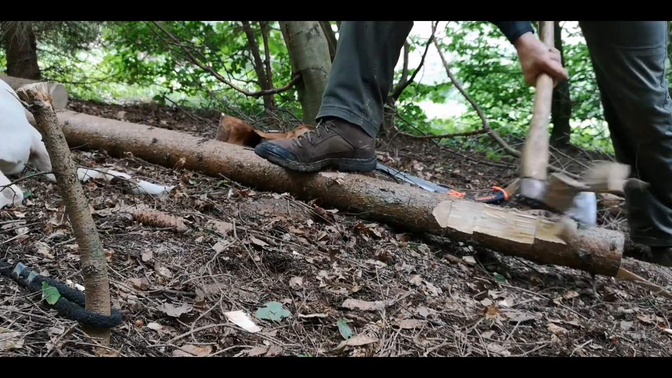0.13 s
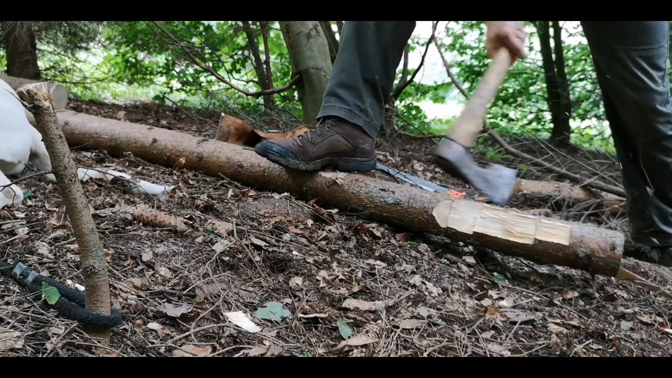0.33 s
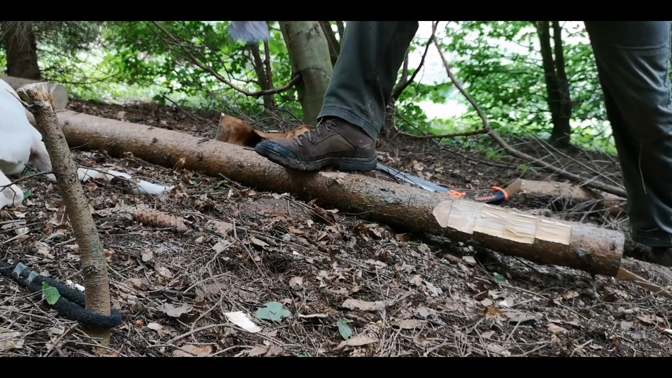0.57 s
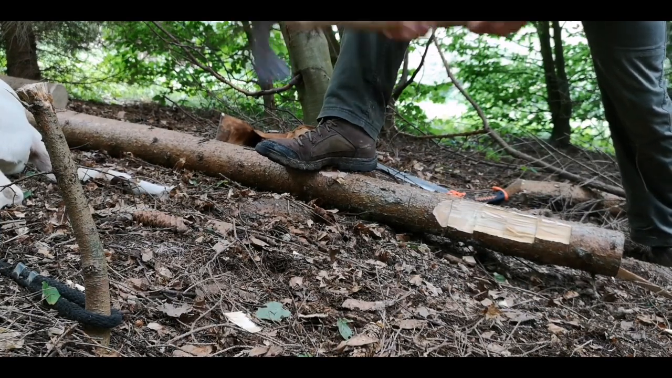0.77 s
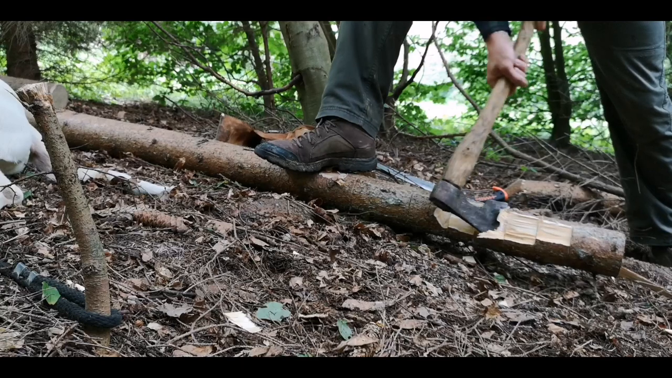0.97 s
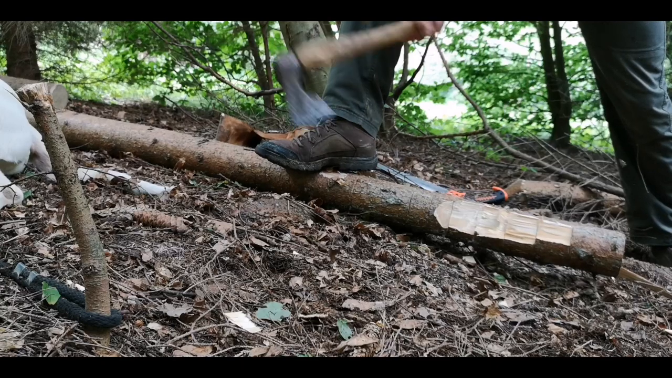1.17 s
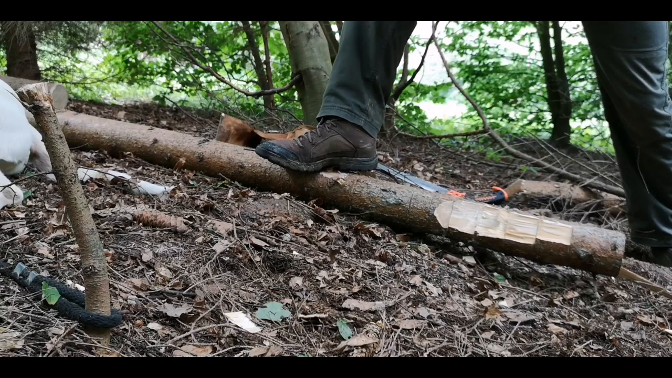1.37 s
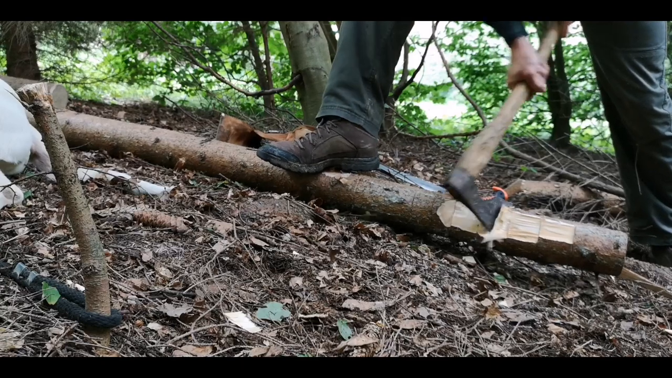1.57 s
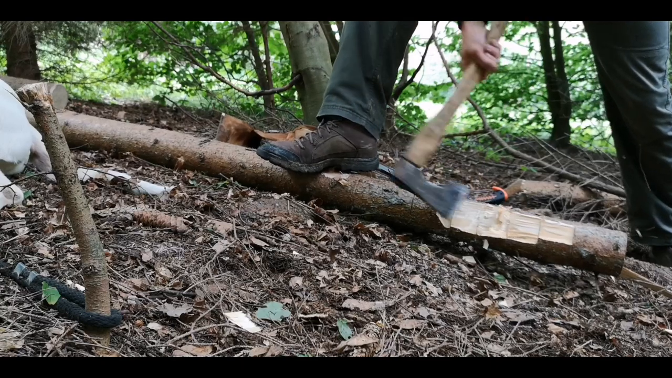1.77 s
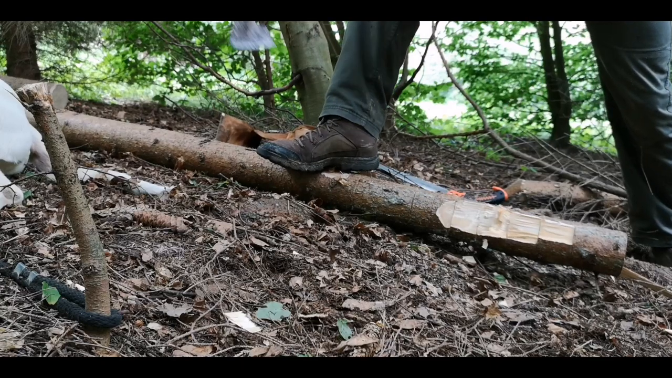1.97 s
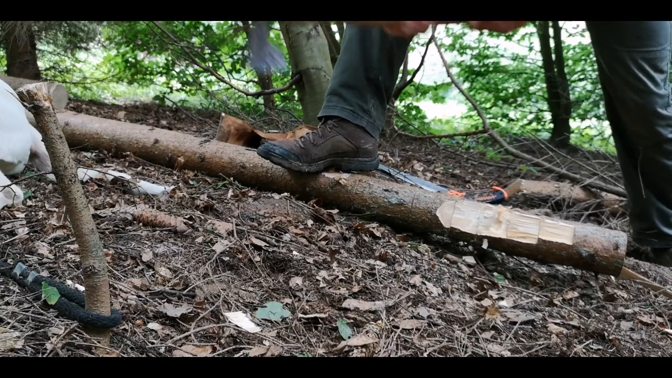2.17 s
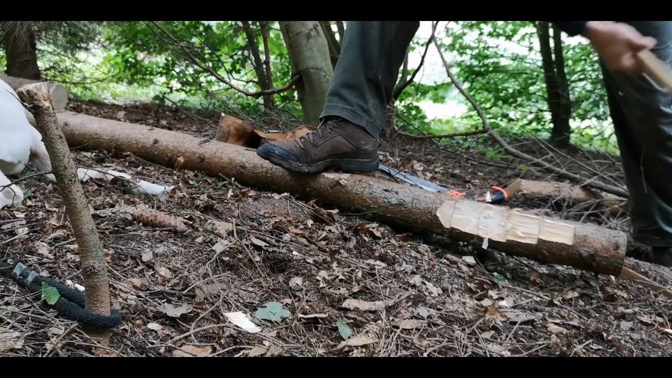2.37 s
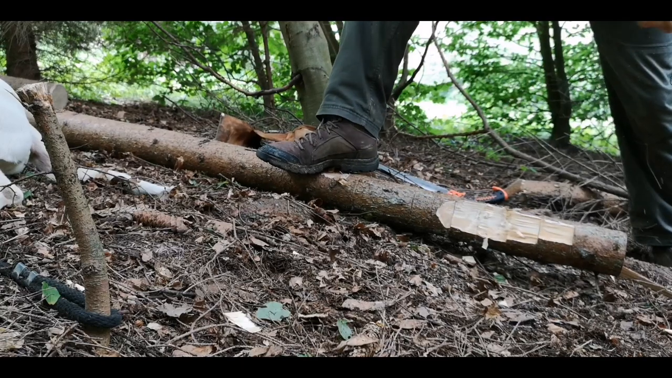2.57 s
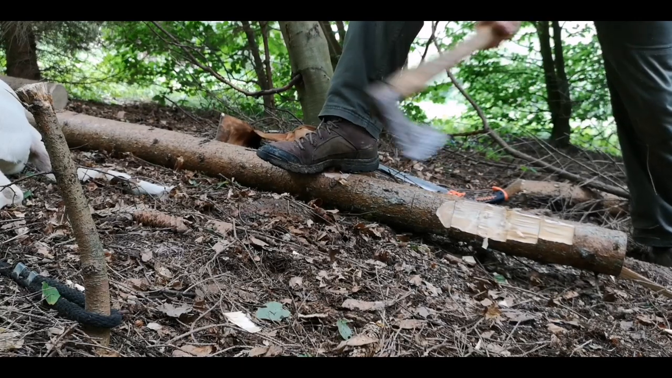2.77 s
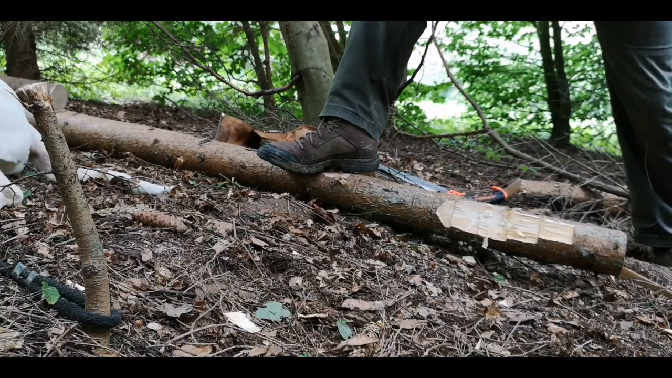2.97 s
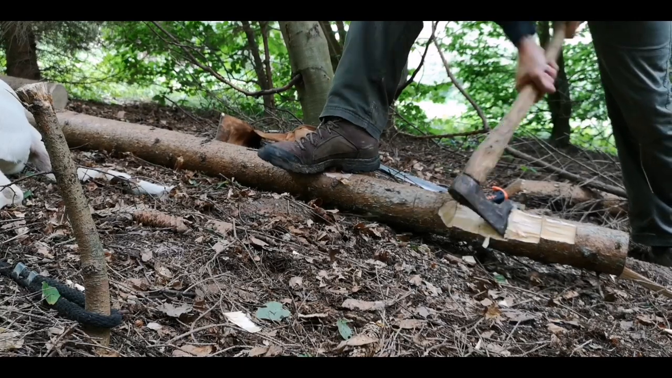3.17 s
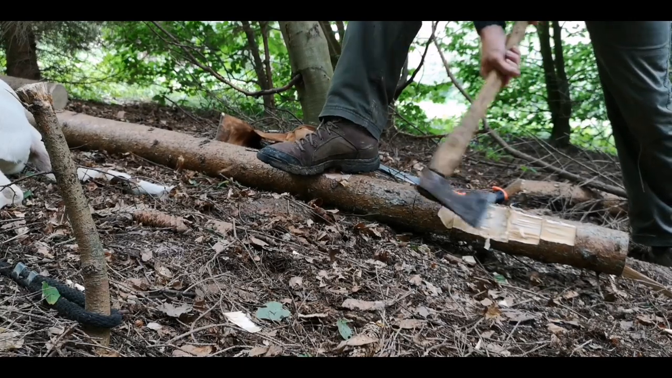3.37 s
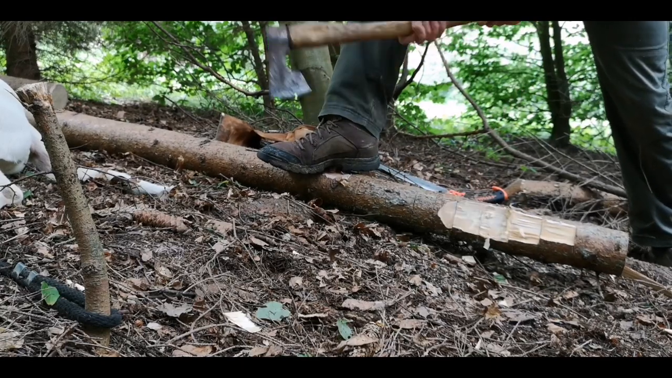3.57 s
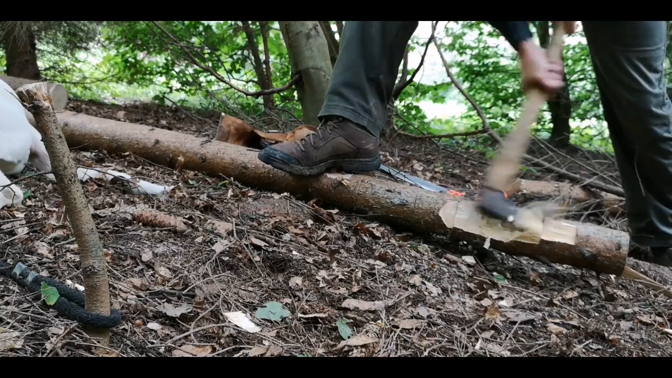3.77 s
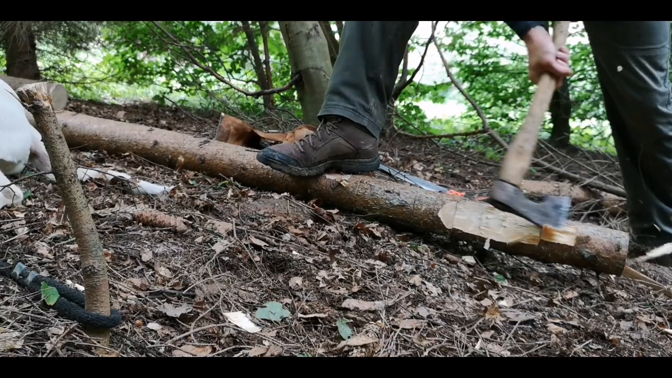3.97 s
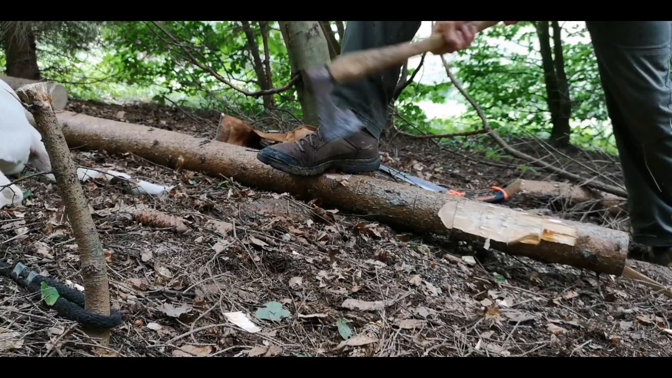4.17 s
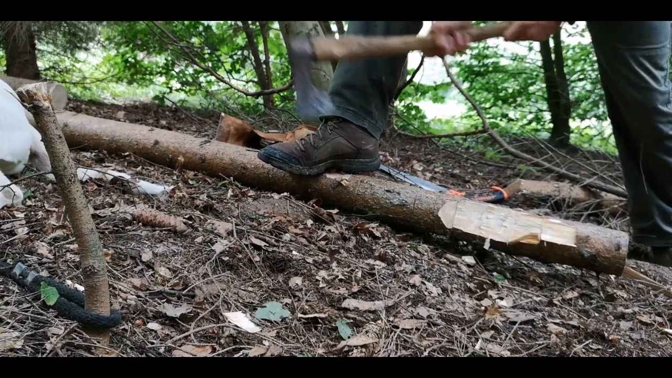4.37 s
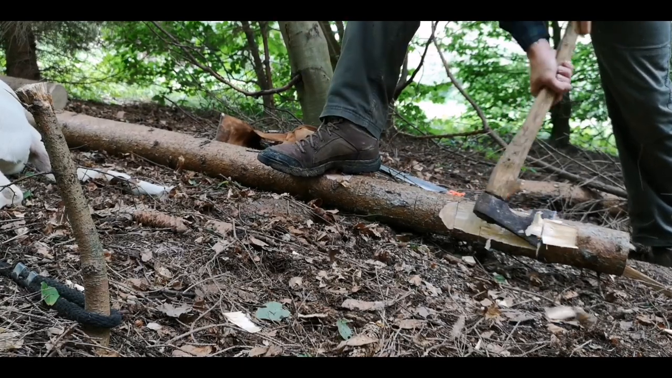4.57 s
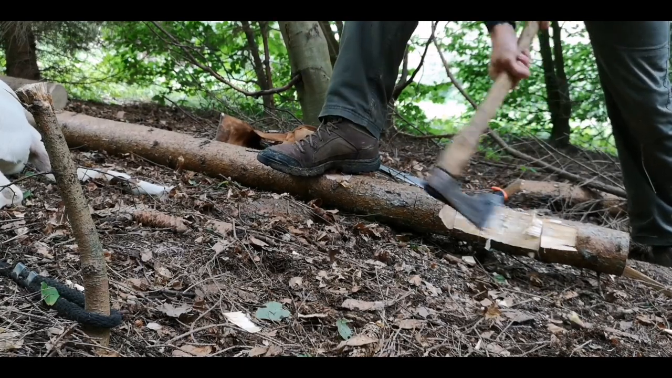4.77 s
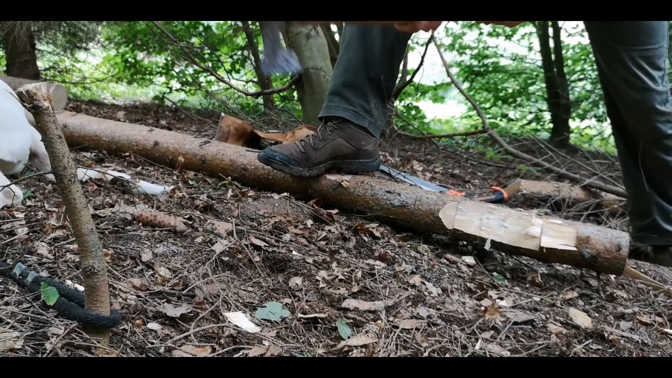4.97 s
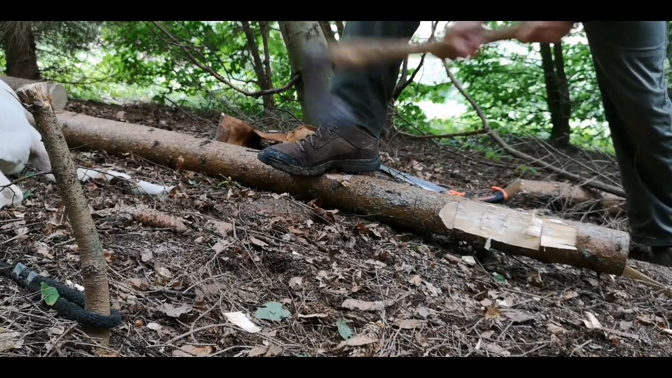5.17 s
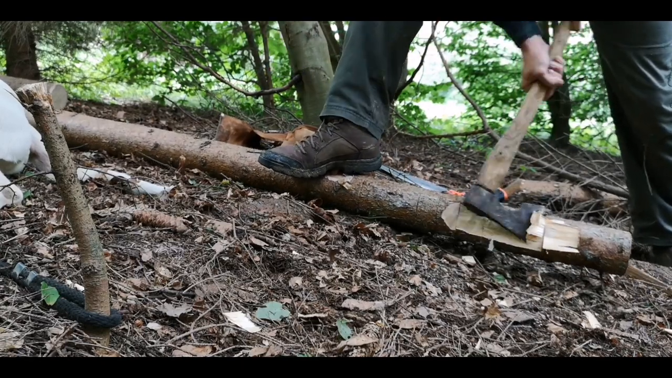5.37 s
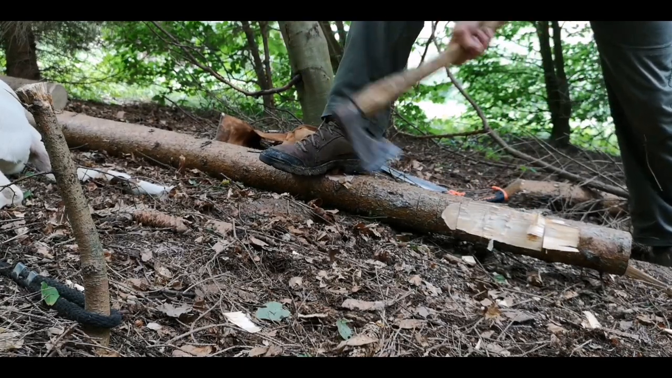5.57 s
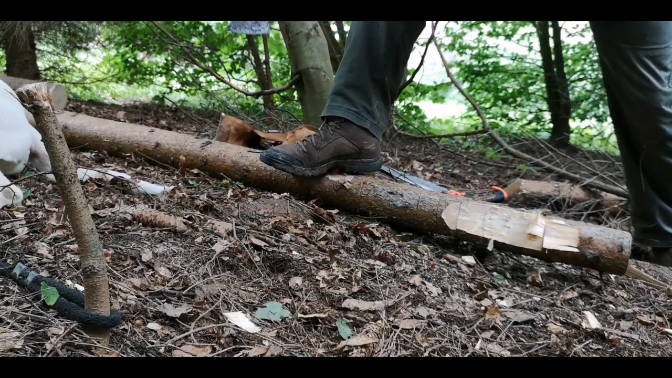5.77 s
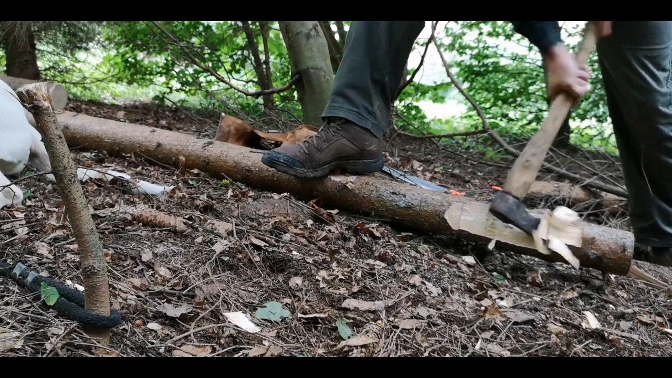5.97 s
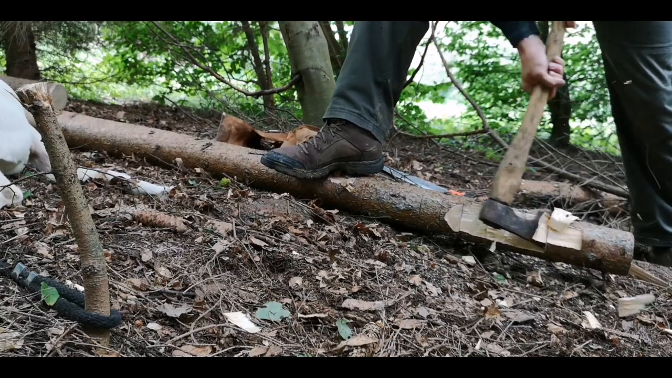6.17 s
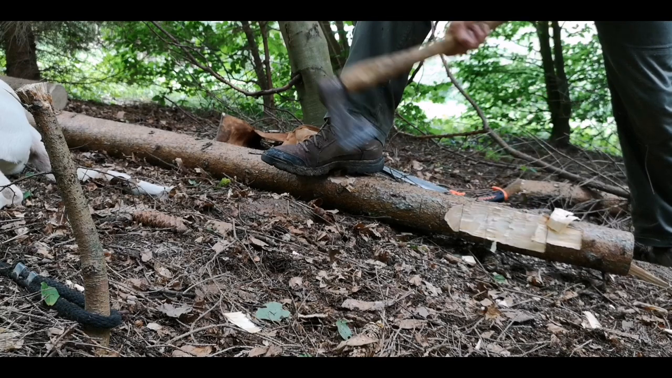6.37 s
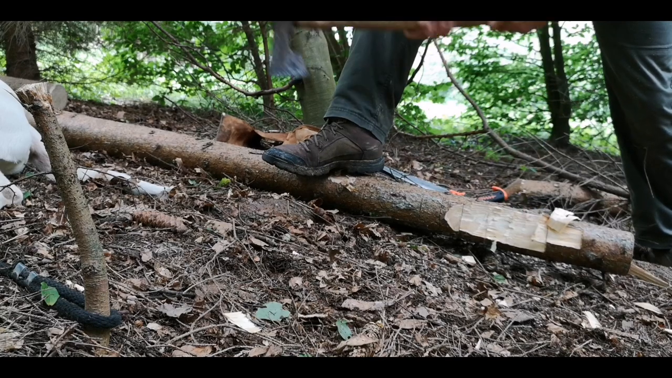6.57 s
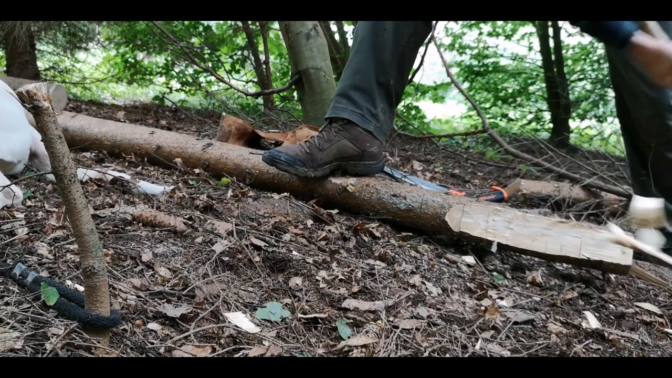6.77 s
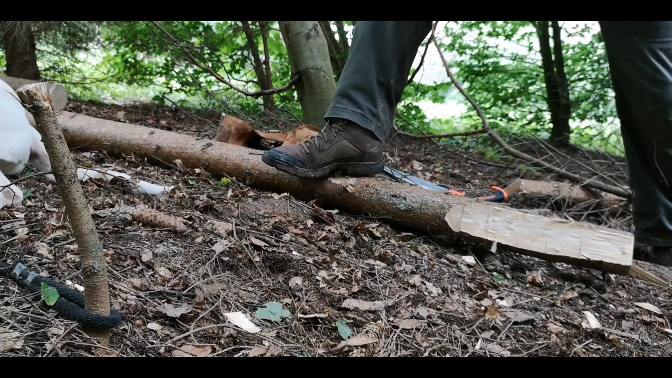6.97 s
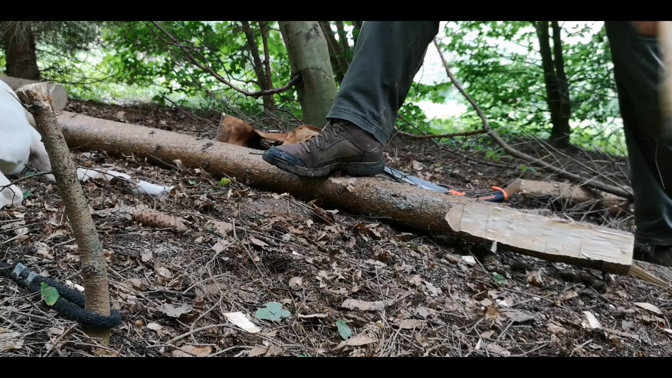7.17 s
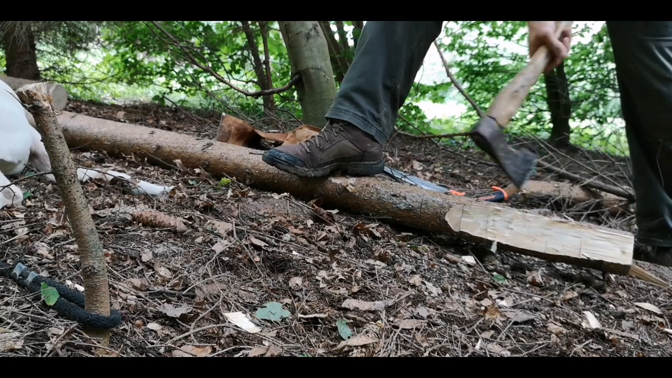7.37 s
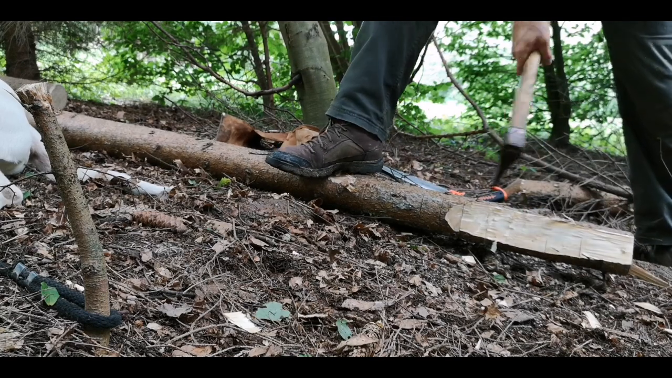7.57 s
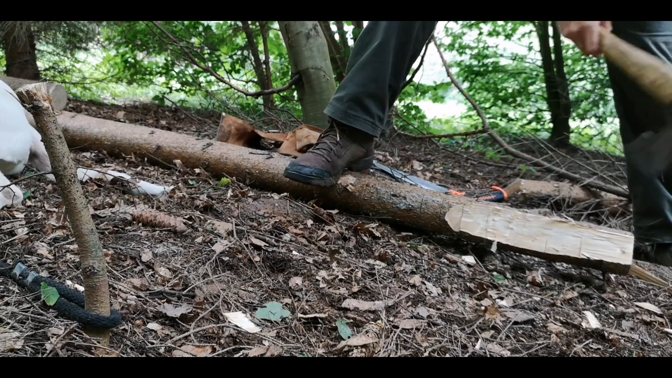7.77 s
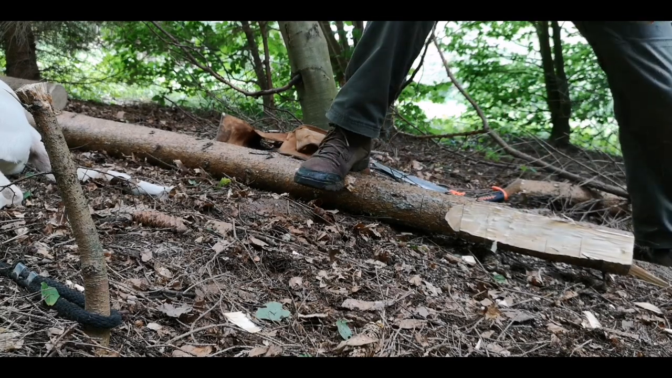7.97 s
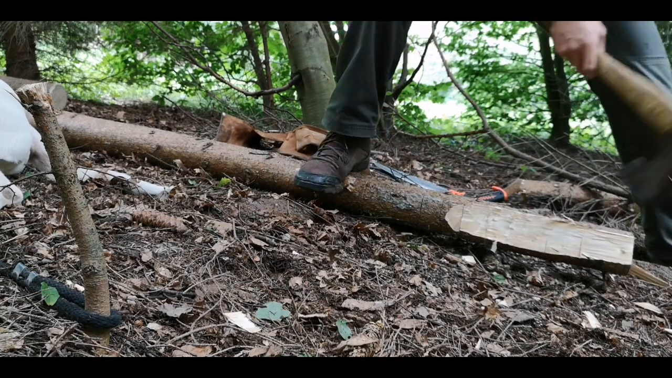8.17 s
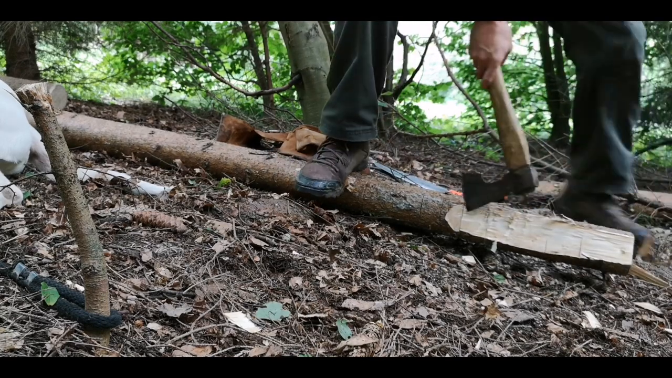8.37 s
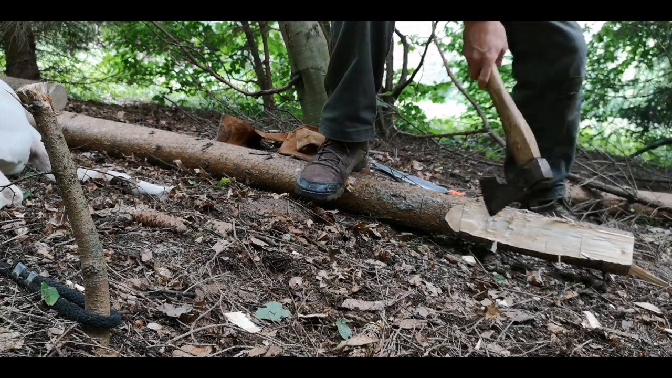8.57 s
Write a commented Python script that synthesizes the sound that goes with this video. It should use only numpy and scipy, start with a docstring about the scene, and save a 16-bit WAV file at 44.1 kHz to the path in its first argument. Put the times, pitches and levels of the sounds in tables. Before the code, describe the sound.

An axe hews a log close by in steady, splintering blows that echo briefly among trees, while chips patter onto leaf litter.

```python
"""Sharp, woody axe blows bite into a felled log, close by in a quiet wood. Each blow rings the log
and the steel head while the fibres split in a cluster of cracks; trunks and a far slope answer.
Chips and bark drop into dry leaf litter, the log bounces and a boot lands near the end.
Far leaves hiss softly underneath."""
import sys
import numpy as np
from scipy import signal
from scipy.fft import rfft, irfft, next_fast_len
from scipy.io import wavfile
from scipy.ndimage import uniform_filter1d, map_coordinates

SR = 44100
rng = np.random.default_rng(int(sys.argv[2]) if len(sys.argv) > 2 else 0)


def transcribe(signal):
    """Save signal, clipped to [-1, 1], as a 16-bit WAV file at the path in sys.argv[1]."""
    frames = np.atleast_2d(signal).T
    limited = np.clip(frames, -1, 1)
    pcm = np.round(limited * 32767).astype(np.int16)
    wavfile.write(sys.argv[1], SR, pcm)


N = 380583

# Blows on the log, two rebounds included. Each row: start in seconds, sway in dB, sway length in seconds,
# thump in dB, seconds the edge keeps driving, five levels in dB for the bend families from low to high,
# axe head in dB, tearing in dB, trunk echo in dB, tail brightness in dB per octave.
BLOWS = [(0.176, -31.5, .15, -18.5, 0.012, -14.5, -23, -17.5, -26, -38, -36.5, -18.5, -30, 0.1),
         (0.996, -31.5, .18, -28, 0.002, -28.5, -26.5, -27.5, -34, -45, -65, -27, -36, -0.5),
         (1.694, -27.5, 0.2, -28, 0.002, -33.5, -27, -39, -34, -50, -69, -26, -35, 0.6),
         (1.83, -58, 0.15, -53, 0.002, -37, -45.5, -53.5, -64, -75, -90, -58, -71, 0.1),
         (2.371, -29.5, .17, -16, 0.017, -17.5, -15.5, -7.5, -31.5, -41, -52, -22, -32, 0.6),
         (3.275, -25.5, 0.22, -24.5, 0.002, -26, -24, -22, -29, -45, -64.5, -25.5, -35.5, 0.1),
         (3.868, -30, .15, -16.5, 0.012, -11.5, -20, -17.5, -35, -41, -55.5, -18, -31.5, 0.1),
         (4.154, -85, .1, -68, 0.002, -68, -70, -59, -65.5, -76, -86.5, -64, -73, 0.1),
         (4.581, -35, 0.17, -23.5, 0.006, -45, -32, -22, -24, -30.5, -56.5, -19, -35, 0.1),
         (5.355, -25.5, 0.21, -30, 0.002, -32.5, -34, -27.5, -32, -50.5, -60, -28, -36, 0.1),
         (6.079, -40, .22, -25, 0.005, -20.5, -32, -25, -30, -30, -58, -18.5, -32, 0.1),
         (6.807, -30, .22, -25, 0.008, -20.5, -36, -32, -21.5, -32, -34.5, -16, -27.5, -0.3),
         (8.438, -35, 0.13, -44, 0.002, -37.5, -44.5, -37.5, -44.5, -65, -96, -42, -50.5, 0.1)]
# The midrange clack of cracks and chips. Each row: centre in Hz, width in Hz, level in dB.
CLACK = [(2060, 610, 0), (2775, 570, -2)]


def log_and_axe_ring():
    """Log and steel ring: where the edge lands sets each bend's level; loose contact adds flutter."""
    # The log's bending modes, one list a family. Each row: pitch in Hz, relative dB, t60 in seconds.
    log_families = [
        [(187.4, -1.5, 0.11)],
        [(343.4, 0.5, 0.23)],
        [(514.4, 0.5, 0.13)],
        [(705.5, 2, 0.13), (852, -9, 0.2), (705, -29, 0.64)],
        [(951, -1.5, 0.25), (1099, 0.5, 0.15), (1120, -35, 1), (1290, -8, 0.069), (1595, -7, 0.12)],
    ]
    # The axe head's modes. Each row: pitch in Hz, relative dB, t60 in seconds.
    steel_modes = [(4640, -1, .3), (5705, 0, .3), (6523, -13, .25), (8900, -12, .2), (11300, -12, .35)]
    out, t = np.zeros(N), np.arange(SR) / SR

    def mode(hz, db, t60, attack, flutter_db):
        flutter = flutter_db * map_coordinates(rng.standard_normal(44), [40 * t])  # 40 values a second
        onset = 1 - np.exp(-(t / attack) ** 2)
        return amp(db + flutter - 60 * t / t60) * np.sin(2 * np.pi * hz * t) * onset

    for start, _, _, _, drive, *bends_db, steel_db, _, _, _ in BLOWS:
        for family, family_db in zip(log_families, bends_db):
            for hz, db, t60 in family:
                detuned = hz * rng.normal(1, 0.0075)
                add(out, start, mode(detuned, db + family_db, t60, drive, flutter_db=2.5 + hz / 400))
        for hz, db, t60 in steel_modes:
            add(out, start, mode(hz, db + steel_db, t60, attack=.002, flutter_db=4.0))
    return out


def fibre_cracks():
    """Splitting fibres fire short bursts, each a mix of low knock, mid clack and bright snap."""
    # Fibres giving way. Each row: peak in seconds, knock, clack and snap in dB, ms to fall 9 dB.
    splits = [(0.1782, -23.5, -12, -26, 2.4), (0.1861, -18, -5.5, -23, 1), (0.1898, -22, -10, -30, 1.4),
              (0.1951, -28.5, -7, -17.5, 2), (0.2085, -33.5, -20.5, -25.5, 3), (0.2115, -33, -20, -30, 2.5),
              (1.0002, -29, -4, -10.5, 0.8), (1.699, -31, -6, -14, 0.9), (1.7015, -15.5, -25, -13, 1),
              (2.3733, -37, -13.5, -22.5, 0.8), (2.3764, -25, -13.5, -16, 2.4),
              (2.3789, -29.5, -21.5, -13, 1), (2.3879, -19, -25.5, -26.5, 5.3),
              (2.3985, -24.5, -24, -27.5, 3.3), (3.2783, -11, -5, -15, 1.5), (3.8698, -26, -16.5, -21, 2.1),
              (3.8777, -28, -13.5, -22.5, 2.6), (3.8807, -22.5, -23.5, -13, 3),
              (3.8906, -24.5, -27, -21.5, 4), (3.8976, -34.5, -26.5, -29, 3.1),
              (3.9098, -37, -30, -26.5, 2.2), (3.9224, -44, -36.5, -33, 2.6), (4.5853, -18.5, -9, -15, 2.8),
              (4.5916, -12, -24, -18.5, 3), (5.3585, -19.5, -10, -14.5, 4), (6.0806, -13, -9, -15.5, 4),
              (6.0846, -15, -15.5, -11.5, 3.2), (6.8099, -19, -7.5, -10.5, 2.4),
              (6.8177, -18, -18, -24.5, 4.7), (6.8356, -38.5, -18, -21, 2.5),
              (8.4427, -52.5, -32.5, -40, 1.8)]
    # The low and the bright colour of a crack. Each row: centre in Hz, width in Hz, level in dB.
    knock = [(520, 98, -2.5), (712, 47, 3.5), (870, 91, -1.5), (1096, 42, -1), (1310, 130, -9)]
    snap = [(4537, 830, 4.5), (5600, 1000, 2.5), (7600, 1800, -2), (9470, 1900, -3), (12800, 9600, -20)]
    return bursts(splits, (knock, CLACK, snap), rise_ms=0.89)


def log_sway():
    """The log thumps and rocks on its rests: pitch climbs as the swing shrinks; the ground stops it."""
    # The dull push of a blow. Each row: centre in Hz, width in Hz, level in dB.
    thump = [(43.5, 14, -7), (143, 37, 3), (227, 64, 1), (310, 100, 0.5)]
    rocking, push, t = np.zeros(N), np.zeros(N), np.arange(SR // 3) / SR
    hz = 80 - 22 * np.exp(-t / 0.054)
    for start, db, length, thump_db, *_ in BLOWS:
        swing = amp(db - 64 * (t / length) ** 2) * (1 - np.exp(-t / .006))
        add(rocking, start, swing * np.sin(2 * np.pi * np.cumsum(hz) / SR))
        add(push, start, amp(thump_db - 60 * t / 0.12))
    return rocking + resonant(push * rng.standard_normal(N), thump)


def tearing_and_trunks():
    """After each blow the cut tears on for a moment and the trunks scatter the crack back for longer."""
    # The colour of each blow's whole tail, tearing and echoes, as the microphone hears it.
    # Each row: frequency in Hz, density in dB.
    tail_colour = [(200, -29), (500, -7), (1000, -6.5), (1500, -8), (2400, -4.5), (3100, -7.5),
                   (3900, -9.5), (4900, -10), (6300, -11), (7800, -8), (9500, -16.5), (10800, -22),
                   (13000, -25), (16000, -41.5)]
    # How the trunk echo lingers by band. Each row: frequency in Hz, factor on the base t60.
    linger = [(300, 0.82), (1000, 0.68), (1600, 1.05), (2400, 1.2), (3300, 0.92), (5000, 1.2), (9000, 0.99),
              (11000, 1.4), (15000, 0.69)]
    tear_t60, trunk_base_t60, deep_t60 = .082, 0.32, 1.1  # seconds
    out = np.zeros((2, N))
    for start, *_, tear_db, echo_db, bright_db in BLOWS:
        noise = unit(spread(rng.standard_normal((2, 3 * SR // 4)), tail_colour))
        hz, t, spectrum = signal.stft(noise, SR, nperseg=256)
        hz = hz[:, None]
        tear = amp(tear_db - 60 * t / tear_t60)
        trunks = amp(echo_db - 60 * t / (trunk_base_t60 * along(linger, hz)))
        deep_wood = amp(echo_db - 20 - 60 * t / deep_t60 - 6 * abs(np.log2(hz / 2300 + .01)))
        brightness = amp(bright_db * np.log2(hz / 2000 + .1))
        tail = signal.istft(spectrum * brightness * (trunks + deep_wood + tear), SR, nperseg=256)[1]
        onset = np.clip(np.arange(tail.shape[1]) / (0.0014 * SR), 0, 1) ** 2
        add(out, start, tail * onset)
    return out


def chip_ticks():
    """Falling chips tick with a sharp start and no body."""
    # Chips and twigs hitting the ground. Each row: peak in seconds, twig in dB, clack in dB.
    landings = [(0.3681, -43, -58), (0.485, -46, -63), (0.747, -52.5, -65), (1.8921, -36.5, -42),
                (1.8981, -47, -43), (2.2589, -55, -69), (2.2636, -55.5, -77), (2.7005, -53.5, -76),
                (2.8889, -56, -58), (2.9715, -57, -57), (3.9613, -35, -56), (4.0975, -25.5, -28.5),
                (4.2834, -54, -63), (4.309, -39, -60), (4.3264, -45, -56), (4.3323, -33.5, -46),
                (4.4298, -52, -66), (4.468, -56, -61.5), (4.4775, -43.5, -55.5), (7.2369, -45, -57.5),
                (7.4577, -47.5, -70), (8.3678, -49, -53), (8.615, -46.5, -71)]
    # The thin colour of a twig. Each row: centre in Hz, width in Hz, level in dB.
    twig = [(4470, 2500, -1.5), (8550, 3000, -1), (11600, 3500, -8)]
    fall_ms = 1.73
    return bursts([(*row, fall_ms) for row in landings], (twig, CLACK), rise_ms=0.32)


def leaf_litter():
    """Each shower of debris swells, fades and crackles in short patches across the treble."""
    # Debris landing in leaves. Each row: peak in seconds, level in dB, seconds to swell 20 dB,
    # seconds to fade 20 dB, left minus right in dB.
    showers = [(.39, -73, 0.016, .08, -0.5), (.486, -57, 0.039, 0.84, -4), (.61, -61, 0.16, 0.14, 2.5),
               (0.75, -59.5, 0.029, 0.065, 2), (0.917, -68.5, .08, 0.03, 4),
               (2.094, -68.5, 0.0076, 0.074, -0.5), (2.512, -46.5, 0.044, 0.049, -1.5),
               (2.72, -68.5, .3, 0.18, -4.5), (2.886, -71, 0.0062, .12, -4), (2.97, -66, .01, .12, -7),
               (3.99, -53.5, 0.032, 0.044, -1.5), (4.05, -61.5, .03, 0.16, -5),
               (4.1, -49.5, 0.023, 0.056, 1), (4.285, -55, 0.0035, 0.21, -10),
               (4.33, -52, 0.049, 0.072, -10), (4.476, -56.5, 0.045, .04, -6.5),
               (4.72, -66.5, .03, 0.055, -2), (4.82, -62.5, 0.023, 0.043, -1),
               (6.31, -59, 0.051, 0.053, -1), (6.52, -76.5, 0.23, .15, 1), (7.03, -45, 0.042, 0.14, -2),
               (7.237, -54, .004, 0.11, -6.5), (7.455, -66, .02, 0.11, -8), (8.28, -73, 0.11, 0.091, 2),
               (8.37, -65, .03, .2, 0), (8.43, -66, 0.089, 0.089, 1), (8.488, -56.5, 0.073, 0.04, -7),
               (8.604, -61.5, 0.059, 0.26, -2)]
    # The rustle of dry leaves. Each row: frequency in Hz, density in dB.
    dry_leaves = [(410, -33), (700, -19.5), (934, -18), (1330, -15.5), (2220, -6), (3500, -10.5),
                  (4490, -9), (5690, -4), (9230, -2.5), (10900, -13), (14600, -17), (15400, -25),
                  (16000, -51.5)]
    gain, t = np.zeros((2, N)), np.arange(-SR // 2, SR) / SR
    for peak, db, swell, fade, pan_db in showers:
        shape_db = db - 20 * np.where(t < 0, -t / swell, t / fade)
        first = max(0, round((-t[0] - peak) * SR))
        add(gain, peak + t[first], amp(shape_db[first:] + [[pan_db / 2], [-pan_db / 2]]))
    return gain * unit(spread(patchy(bands=24, steps=2, depth_db=3.5), dry_leaves))


def boot():
    """A boot on soft ground gives low pushes with no ring."""
    # The thuds of one footfall. Each row: peak in seconds, level in dB, pitch in Hz.
    thuds = [(8.585, -29, 81), (8.607, -32.5, 38.16)]
    out, t = np.zeros(N), np.arange(-SR // 20, SR // 20) / SR
    for peak, db, hz in thuds:
        add(out, peak + t[0], -amp(db) * np.cos(2 * np.pi * hz * t) * np.exp(-(t * hz / 0.55) ** 2))
    return out


def slope_echo(cracks):
    """A far slope returns each crack once, dull and smeared."""
    # The colour of the slope's answer. Each row: centre in Hz, width in Hz, level in dB.
    slope = [(720, 220, -2), (1110, 350, -3)]
    delay_s, t = .147, np.arange(SR // 10) / SR
    smear = rng.standard_normal((2, len(t))) * np.exp(-((t - .02) / 0.023) ** 2)
    smear /= np.linalg.norm(smear[0])
    dull = resonant(resonant(cracks, slope), slope)
    late = np.pad(dull, (round(delay_s * SR), 0))[None]
    return amp(-70) * signal.fftconvolve(late, smear, axes=1)[:, :N]


def far_leaves():
    """Distant foliage hisses in slow, shallow patches over a low rumble of air."""
    # The bed of leaves and air. Each row: frequency in Hz, density in dB.
    bed = [(12, -34.5), (20, -2.5), (70, 0.5), (123, -9), (193, -9), (319, -19), (357, -21.5), (527, -22),
           (976, -20), (1530, -15), (2460, -18.5), (6360, -27), (7950, -25.5), (16000, -41.5)]
    return amp(-68.5) * unit(spread(patchy(bands=4, steps=30, depth_db=1.5), bed))


def microphone_ports(x):
    """A near source reaches the two microphone ports with a phase lead and a level tilt."""
    # Phase between the ports. Each row: frequency in Hz, left lead in radians.
    lead = [(20, 0), (60, .06), (170, .2), (300, .8), (520, 1.3), (780, 1.4), (1120, .3), (2240, -1.8),
            (3190, -1.9), (3790, -3), (5430, -4.6), (8350, -7.5), (13700, -10), (16100, -12.6)]
    # Balance between the ports. Each row: frequency in Hz, left minus right in dB.
    tilt = [(60, 0), (400, -.5), (550, -1), (790, 1.5), (1140, 3.5), (1650, 4.5), (2380, -1.5), (3440, -.5),
            (4970, 2), (7180, 0), (10400, -6), (15000, -4)]
    left = lambda hz: amp(along(tilt, hz) / 2) * np.exp(.5j * along(lead, hz))
    return filtered(x, lambda hz: np.array([left(hz), 1 / left(hz)]))


def spread(pair, spectrum):
    """Two unrelated noises, coloured and mixed to the stereo width of distant sound."""
    # How alike the two sides are. Each row: frequency in Hz, left-right correlation.
    likeness = [(60, 0.76), (130, 0.93), (290, 0.71), (640, 0.59), (1410, -0.27), (3100, 0.13),
                (6820, -0.43), (15000, 0.054)]

    def mid_and_side(hz):
        angle = np.arccos(np.clip(along(likeness, hz), -1, 1)) / 2
        return amp(along(spectrum, hz)) * [np.cos(angle), np.sin(angle)]

    mid, side = filtered(pair, mid_and_side)
    return np.array([mid + side, mid - side])


def bursts(rows, colours, rise_ms):
    """Noise bursts that leap to a peak and die, each with its own share of every colour."""
    gates, lead_s = np.zeros((len(colours), N)), .012
    ms = np.arange(-lead_s * SR, .08 * SR) / SR * 1000
    for peak, *levels_db, fall_ms in rows:
        drop_db = np.where(ms < 0, 7 * (ms / rise_ms) ** 2, 9 * ms / fall_ms)
        add(gates, peak - lead_s, amp(np.array(levels_db)[:, None] - drop_db))
    return sum(resonant(gate * rng.standard_normal(N), peaks) for gate, peaks in zip(gates, colours))


def patchy(bands, steps, depth_db):
    """Two unrelated noises sharing patches of random gain in frequency and time."""
    spectrum = signal.stft(rng.standard_normal((2, N)), nperseg=256)[2]
    field = rng.standard_normal(spectrum.shape[1:])
    patches = uniform_filter1d(uniform_filter1d(field, bands, 0), steps, 1)
    return signal.istft(spectrum * amp(depth_db * unit(patches)), nperseg=256)[1][:, :N]


def resonant(x, peaks):
    """Parallel resonances of alternating polarity, scaled so white noise keeps its power."""
    def response(hz):
        return sum((-1) ** k * amp(db) * 1j * hz * width / (centre ** 2 - hz ** 2 + 1j * hz * width)
                   for k, (centre, width, db) in enumerate(peaks))

    power = np.mean(abs(response(np.linspace(0, SR / 2, 2000))) ** 2)
    return filtered(x, response) / np.sqrt(power)


def filtered(x, response):
    """Shape x with a complex response of frequency."""
    size = next_fast_len(x.shape[-1] + 8192)
    return irfft(rfft(x, size) * response(np.fft.rfftfreq(size, 1 / SR)), size)[..., :x.shape[-1]]


def along(points, hz):
    """Read a curve of (Hz, value) points on a log frequency axis."""
    knots, values = np.transpose(points)
    return np.interp(np.log(hz + 1), np.log(knots + 1), values)


def add(track, start_s, sound):
    i = round(start_s * SR)
    track[..., i:i + sound.shape[-1]] += sound[..., :track.shape[-1] - i]


def amp(db):
    return 10 ** (np.asarray(db) / 20)


def unit(x):
    return x / np.sqrt(np.mean(x ** 2) + 1e-20)


def scene():
    """Close axe work up front; echoes, litter and far leaves wide around it."""
    cracks = fibre_cracks()
    near = log_and_axe_ring() + log_sway() + cracks + chip_ticks() + boot()
    return microphone_ports(near) + tearing_and_trunks() + slope_echo(cracks) + leaf_litter() + far_leaves()


def record(dry):
    """The loudest cracks round off at full scale; the highest treble fades out at the band limit."""
    top_hz, fade_hz = 16500, 900
    rounded = dry / (1 + abs(dry) ** 6) ** (1 / 6)
    return filtered(rounded, lambda hz: np.sin(np.pi / 2 * np.clip((top_hz - hz) / fade_hz, 0, 1)) ** 2)


dry = scene()
out = record(dry)
transcribe(out)
```